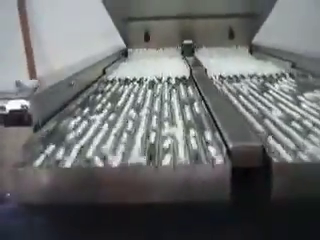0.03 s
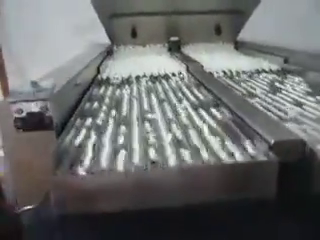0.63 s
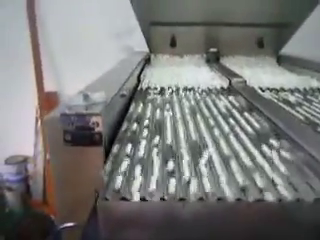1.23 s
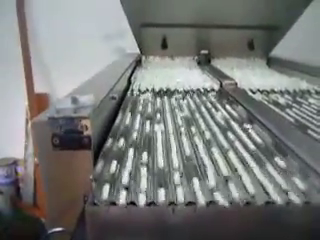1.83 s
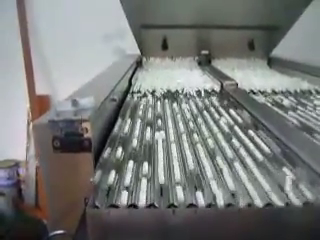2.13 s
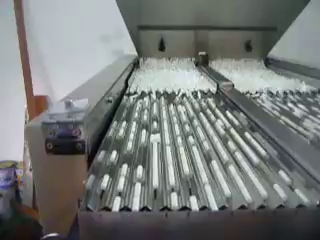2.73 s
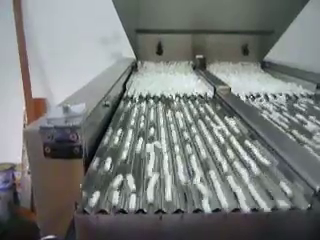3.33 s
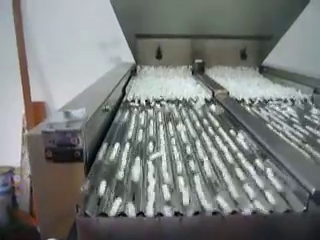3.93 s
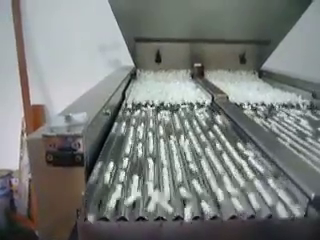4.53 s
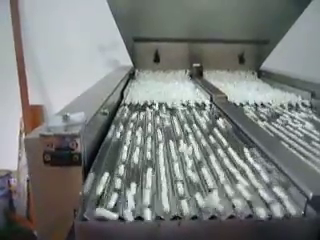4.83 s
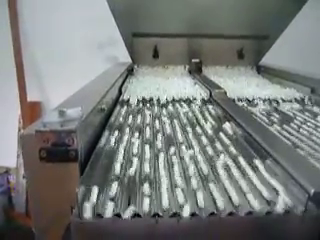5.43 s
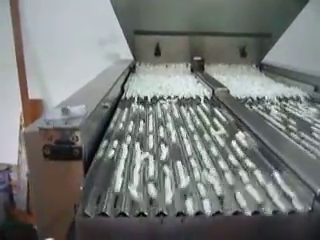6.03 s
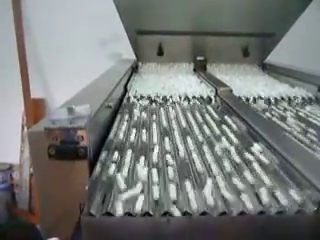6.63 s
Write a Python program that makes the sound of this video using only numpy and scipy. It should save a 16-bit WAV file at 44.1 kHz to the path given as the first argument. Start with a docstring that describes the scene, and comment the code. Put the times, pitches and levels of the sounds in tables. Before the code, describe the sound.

Close up, the vibrating steel trays of a counting machine hum and ring, with a thin high buzz and a fine rattle of capsules. After about a second the machine eases and capsules clatter into a steel chute. A second later comes a louder clatter of sharp plastic ticks, and the hum sinks to idle. Around three seconds in, the full hum returns and runs on steadily over a low shudder.

```python
"""Steel trays of a capsule counting machine, close up: electromagnets shake them at the mains rate,
so they hum and ring while the capsules on them rattle. The drive eases off twice, and capsules drop
into a steel chute with a short plastic clatter. A second feeder adds a thin, high buzz and pauses once.
Underneath, the frame shudders and rings low."""
import sys
import numpy as np
from scipy import signal
from scipy.fft import rfft, irfft
from scipy.io import wavfile
from scipy.ndimage import uniform_filter1d

SR = 44100
rng = np.random.default_rng(int(sys.argv[2]) if len(sys.argv) > 2 else 0)


def generate_wav(signal):
    """Clip the signal to [-1, 1] and save it as 16-bit WAV at the path in sys.argv[1]."""
    frames = np.transpose(np.atleast_2d(signal))
    scaled = np.clip(frames, -1, 1) * 32767
    pcm = np.round(scaled).astype(np.int16)
    wavfile.write(sys.argv[1], SR, pcm)


N = 295470
T = np.arange(N) / SR
MAINS_HZ, EDGE_HZ = 50.071, 8900
BUZZ_ORDERS = np.arange(47, EDGE_HZ // MAINS_HZ)  # mains multiples above the tray's main partials

# second feeder pauses, restarts, then runs harder: (time [s], glide [s], stroke [dB])
FEEDER_STROKES = [(0.84, 0.042, -14), (1.93, 0.027, -1.5), (3.55, 0.039, 0.9)]


def gain_of(db):
    return 10 ** (np.asarray(db) / 20)


def unit_rms(x):
    return x / np.sqrt(np.mean(x ** 2) + 1e-20)


def gains_at(spectrum, hz):
    """Gains of a (frequency [Hz], level [dB]) curve, interpolated in log frequency."""
    knots_hz, db = np.transpose(spectrum)
    return gain_of(np.interp(np.log(hz + 1), np.log(knots_hz + 1), db))


def coloured(x, spectrum):
    """x filtered by a spectrum, at rms 1."""
    hz = np.fft.rfftfreq(len(x), 1 / SR)
    return unit_rms(irfft(rfft(x) * gains_at(spectrum, hz), len(x)))


def add(mix, start_s, sound):
    part = mix[max(round(start_s * SR), 0):][:len(sound)]
    part += sound[:len(part)]


def drift(rate_hz):
    """Random wander of about unit size."""
    knots = rng.standard_normal(400)
    return np.interp(T * rate_hz, np.arange(len(knots)), knots)


def stroke_db(switches):
    """Stroke over time: starts at full, glides to each setting."""
    swing = np.ones(N)
    for start_s, glide_s, setting_db in switches:
        swing += (gain_of(setting_db) - swing) * np.clip((T - start_s) / glide_s, 0, 1)
    return 20 * np.log10(swing)


def driven(full_db, idle_db, slope):
    """Gain that follows the main tray's stroke (slope in dB/dB), over an idle floor."""
    # half, briefly up, idle, near full: (time [s], glide [s], stroke [dB])
    tray_strokes = [(0.87, 0.11, -5.5), (1.94, .06, -2.7), (2.015, .14, -19), (3.11, 0.17, -1)]
    return np.hypot(gain_of(full_db + slope * stroke_db(tray_strokes)), gain_of(idle_db))


def sway():
    """The frame's lowest resonance, stirred by the second feeder, beats against the hum."""
    # (frequency [Hz], relative density [dB])
    resonance = [(150, -63), (225, -26.5), (246, -3.5), (254, 2.5), (262, -6.5), (285, -28.5), (400, -62)]
    return gain_of(-47 + 0.42 * stroke_db(FEEDER_STROKES)) * coloured(rng.standard_normal(N), resonance)


def jolts():
    """The frame swings up and rings low when its load changes."""
    # (time [s], level [dB])
    load_changes = [(0.281, -30), (0.9, -28.5), (2.022, -27.5), (2.15, -23), (3.005, -33.5), (3.173, -42)]
    # (frequency [Hz], relative level [dB], t60 [s])
    frame_modes = [(296.8, -0.5, 0.53), (267, -5, 0.47), (434, -6, 0.33), (495, -8, 0.48)]
    out, t = np.zeros(N), np.arange(SR) / SR
    for start_s, level_db in load_changes:
        ring = sum(gain_of(db - 60 * t / t60_s) * np.sin(2 * np.pi * (hz * t + rng.random()))
                   for hz, db, t60_s in frame_modes)
        add(out, start_s, gain_of(level_db) * ring * (1 - np.exp(-t / 0.012)))
    return out


def surges():
    """Rattle and shudder gains as a crowd of capsules shifts at once."""
    # (peak time [s], 1/e half width [s], rattle [dB], shudder [dB])
    shifts = [(0.31, 0.082, -42, -36), (0.99, 0.17, -37, -38.5), (1.33, .16, -38.5, -40.5),
              (2.1, 0.18, -34.5, -40.5), (3.18, 0.075, -40.5, -40), (5.85, 0.14, -37.5, -36),
              (6.58, .08, -37, -41)]
    power = np.zeros((2, N))
    for peak_s, width_s, rattle_db, shudder_db in shifts:
        swell = np.exp(-((T - peak_s) / width_s) ** 2)
        power += np.outer(gain_of([rattle_db, shudder_db]), swell) ** 2
    return np.sqrt(power)


def rattle(turns):
    """Capsules hop on each stroke, over the dull shudder of the frame."""
    # (frequency [Hz], relative density [dB])
    tap_spectrum = [(300, -28.5), (480, -0.5), (800, 1.5), (990, 3.5), (1200, 0), (1390, 0), (1750, -4.5),
                    (2300, -5), (3700, -13), (4500, -16), (7200, -23), (8100, -28), (9000, -56.5)]
    # (frequency [Hz], relative density [dB])
    shudder_spectrum = [(20, -37), (50, -14), (70, -23), (110, -8), (190, -3), (255, -2.5), (310, -0.5),
                        (360, -0.5), (430, -2), (540, -18.5), (900, -57)]
    tap_surge, shudder_surge = surges()
    tap_gain = np.hypot(driven(full_db=-42, idle_db=-41, slope=0.88), tap_surge)
    shudder_gain = np.hypot(gain_of(-43.5), shudder_surge)
    taps = rng.standard_normal(N) * (rng.random(N) < 5000 / SR)  # 5000 taps/s
    taps *= gain_of(0.83 * np.cos(4 * np.pi * turns) + 1.2 * np.cos(2 * np.pi * turns) + 1.5 * drift(30))
    shudder = coloured(rng.standard_normal(N), shudder_spectrum)
    return tap_gain * coloured(taps, tap_spectrum) + shudder_gain * shudder


def housing(x, t60_s, wet_db):
    """Adds dense echoes from the steel housing and the walls."""
    t = np.arange(SR // 2) / SR
    echoes = rng.standard_normal(len(t)) * (rng.random(len(t)) < 3000 / SR)
    tail = echoes * gain_of(-60 * t / t60_s) * (t > 0.004)
    return x + gain_of(wet_db) * signal.fftconvolve(x, tail / np.linalg.norm(tail))[:N]


def burst(t, spectrum, t60_s, rise_s):
    """Many close modes, struck and dying away."""
    envelope = gain_of(-60 * t / t60_s) * (1 - np.exp(-t / rise_s))
    return envelope * coloured(rng.standard_normal(len(t)), spectrum)


def drops():
    """Each capsule lands with a hard tick, its shell crackles, the chute rings; then a weaker bounce."""
    # (time [s], tick peak [dB], tick pitch [Hz], shell [dB], chute base level [dB], chute pitch [Hz])
    landings = [(0.9161, -17, 5460, -21.5, -24, 1010), (0.9635, -19, 4900, -23, -24, 1090),
                (0.9852, -15, 6800, -23, -30, 800), (1.01, -25, 7200, -28, -27, 1090),
                (1.037, -29, 4520, -26, -30, 1110), (1.061, -23, 5230, -24.5, -28, 1090),
                (1.0982, -24, 5790, -25, -26.5, 1200), (1.2601, -26, 4500, -26, -26.5, 1360),
                (1.3062, -24, 7360, -26.5, -26.5, 1414), (2.0252, -8, 6040, -23, -25, 1266),
                (2.04, -18, 6790, -27, -30, 990), (2.057, -18, 6560, -30, -27, 1700),
                (2.0754, -15, 4720, -22, -28, 1240), (2.1062, -21, 5400, -26, -24.5, 960),
                (2.1317, -13.5, 6300, -21.5, -28, 1150), (2.151, -19, 6440, -25.5, -28, 990),
                (2.2593, -12.5, 5750, -23.5, -24.5, 1246), (2.3284, -17, 5900, -25.5, -22.5, 1285),
                (2.455, -14, 6930, -21.5, -23, 1240), (3.004, -41, 3850, -40, -32.5, 1000)]
    # (frequency [Hz], relative density [dB])
    shell_spectrum = [(1500, -4), (2900, -7), (3900, 0), (4700, 0), (6000, 1), (7300, 2), (8100, -10),
                      (9000, -50)]
    # (frequency [Hz], relative density [dB])
    chute_spectrum = [(250, -16), (600, -4.5), (950, 2), (1350, 0.5), (1700, 2), (2100, 0.5), (3000, -25),
                      (4500, -25.5)]
    # steel under a capsule: (frequency [Hz], relative density [dB])
    clink_spectrum = [(1800, -27), (2500, 0), (3000, 1), (3500, -9.5), (4300, -31.5)]
    ticks, shells, chutes = np.zeros((3, N))
    t = np.arange(SR // 5) / SR
    tick_rise_s = 0.00038
    tick_envelope = t / tick_rise_s * np.exp(1 - t / tick_rise_s)
    for time_s, tick_db, tick_hz, shell_db, chute_db, chute_hz in landings:
        start_s = time_s + 0.0007
        add(ticks, start_s, gain_of(tick_db) * tick_envelope * np.sin(2 * np.pi * tick_hz * t))
        bounce_s = 0.011 * rng.uniform(0.9, 1.1)
        for delay_s, hit_db in [(0, 0), (bounce_s, -7)]:
            shell = gain_of(shell_db) * burst(t, shell_spectrum, t60_s=0.035, rise_s=0.0003)
            chute = gain_of(chute_db + 1) * burst(t, chute_spectrum, t60_s=0.036, rise_s=0.00069)
            clink = gain_of(chute_db - 7.5) * burst(t, clink_spectrum, t60_s=0.036, rise_s=0.00024)
            note = gain_of(chute_db + 4 - 60 * t / 0.028) * np.sin(2 * np.pi * chute_hz * t)
            add(shells, start_s + delay_s, gain_of(hit_db) * shell)
            add(chutes, start_s + delay_s, gain_of(hit_db) * (chute + clink + note))
    return ticks + housing(shells, t60_s=0.19, wet_db=-5) + housing(chutes, t60_s=0.17, wet_db=-3.5)


def struck_phases(orders, decay_cycles):
    """Phases [rad] of partials in metal struck on both half strokes."""
    cycle = np.arange(1024) / 1024
    blows = np.exp(-cycle / decay_cycles) + 1.04 * np.exp(-((cycle + 0.5) % 1) / decay_cycles)
    spectrum = rfft(blows * rng.standard_normal(len(cycle)))
    return -np.angle(spectrum)[np.round(orders).astype(int)]


def buzz(turns, sizes, blend):
    """One cycle of ringing metal, repeated; loose contact blends in two other ways of ringing."""
    cycle = np.linspace(0, 1, 4097)
    angle = 2 * np.pi * np.outer(cycle, BUZZ_ORDERS)
    shapes = [np.cos(angle - struck_phases(BUZZ_ORDERS, decay_cycles=0.62)) @ sizes for _ in range(3)]
    steady, slow, fast = [np.interp(turns % 1, cycle, shape) for shape in shapes]
    return unit_rms(steady + blend * (drift(7) * slow + drift(16) * fast))


def second_feeder(turns):
    """Metal chatters on both half strokes, favouring even multiples; fizz pulses once a cycle."""
    # strongest partials: (frequency [Hz], relative level [dB])
    whines = [(2702, -61), (2756, -47.5), (2955, -51), (3004, -45), (3052, -46), (3155, -52.5), (3305, -76),
              (3354, -60.5), (3607, -52.5), (3704, -48), (3758, -67.5), (3806, -56.5), (3854, -48.5),
              (3903, -64.5), (3957, -68), (4156, -55), (4807, -55.5), (4904, -63.5), (5206, -62.5),
              (5857, -64.5), (6207, -60), (7009, -58), (7407, -53), (8592, -73)]
    # envelope of the weaker partials: (frequency [Hz], relative level [dB])
    chatter = [(2000, -79.5), (2600, -71.5), (3300, -64.5), (3900, -71.5), (4400, -80), (4650, -64),
               (5000, -61.5), (7200, -68.5), (8100, -71.5), (9000, -96.5)]
    # (frequency [Hz], relative density [dB])
    fizz_spectrum = [(2000, -11), (2850, -8.5), (3030, 7), (3250, -2.5), (3750, 8), (4050, -11.5),
                     (4190, 6.5), (4350, -8), (7280, -4), (7410, 4), (7540, -10), (8000, -11),
                     (8500, -17.5), (9000, -46.5)]
    hz = BUZZ_ORDERS * MAINS_HZ
    sizes = gains_at(chatter, hz) * gain_of(-4 * (BUZZ_ORDERS % 2))
    for whine_hz, db in whines:
        sizes[np.argmin(abs(hz - whine_hz))] = gain_of(db)
    pulses = gain_of(20 * np.sin(2 * np.pi * turns))
    fizz = gain_of(-6.5) * coloured(rng.standard_normal(N) * pulses, fizz_spectrum)
    return gain_of(-44.5 + stroke_db(FEEDER_STROKES)) * (buzz(turns, sizes, blend=0.15) + fizz)


def singing(hum, turns):
    """Single partials swell or hush as the steel sheets drift in and out of tune with them."""
    # (peak time [s], length [s], mains multiple, lift [dB])
    swells = [(0.1, 1.1, 60, -7), (0.15, 1.23, 61, 9), (.3, 1.1, 15, 6), (0.398, 1.8, 9, 6),
              (.55, 1.6, 6, 3.5), (0.65, 0.74, 26, 9.5), (1.65, 1, 21, 15), (2.852, 0.86, 5, 8),
              (3.265, .5, 7, 6), (3.454, 1, 6, 3.5), (3.505, 0.46, 29, 5), (4.7, 1.6, 8, 1.5),
              (5.398, 0.93, 31, 4), (5.75, 1.3, 55, 3.5), (5.4, .6, 20, 1), (6.2, .9, 19, 7),
              (6.25, .9, 7, 1), (6.34, 3.7, 12, 5.5)]
    out = hum.copy()
    for peak_s, length_s, order, lift_db in swells:
        swell = np.cos(np.pi * np.clip((T - peak_s) / length_s, -0.5, 0.5))
        carrier = np.exp(2j * np.pi * round(order) * turns)
        amplitude = uniform_filter1d(hum / carrier, size=round(2 * SR / MAINS_HZ))  # two-cycle mean
        partial = 2 * (carrier * amplitude).real
        out += (gain_of(lift_db * swell) - 1) * partial
    return out


def stack(turns, orders, sizes, phases, waver_db):
    """Partials of a repeating stroke, at rms 1; weaker ones waver more."""
    out = np.zeros(N)
    for order, size, phase in zip(orders, sizes, phases):
        waver = gain_of(waver_db * min(sizes.max() / size, 3) * drift(5))
        out += size * waver * np.cos(2 * np.pi * order * turns - phase)
    return unit_rms(out)


def tray(turns):
    """The magnets hum, the springs knock once a cycle, and the steel sheet rings with every knock."""
    # (mains multiple, level within its group [dB])
    partials = [(1, -32), (2, -1.5), (3, -1), (4, 0.5), (5, -2), (6, -5.5), (7, -13), (8, -5.5), (9, -14),
                (10, -20), (11, -19), (12, -16), (13, -11), (14, -17.5), (15, -13), (16, -18.5), (17, -24),
                (18, -19.5), (19, -13.5), (20, -6), (21, -20), (22, -16.5), (23, -23.5), (24, -18.5),
                (25, -20.5), (26, -17.5), (27, -9.5), (28, -22), (29, -10.5), (30, -26), (31, -16.5),
                (32, -15.5), (33, -30), (34, -23.5), (35, -17.5), (36, -34), (37, -28), (38, -16),
                (39, -21), (40, -25.5), (41, -18), (42, -26), (43, -38), (44, -23), (45, -18), (46, -27.5)]
    # envelope of the weak partials above those: (frequency [Hz], relative level [dB])
    overtones = [(2350, -21), (2800, -25), (3400, -29.5), (4150, -25.5), (4500, -43), (7000, -33.5),
                 (9000, -79)]
    # slow level trims: (time [s], knock [dB], ring [dB])
    trims = [(0, -2.5, -2.5), (.3, -0.5, -4), (.85, -1, -1.6), (3.18, 0.5, -2), (3.35, 1, .5),
             (5.15, 1.2, 0.3), (5.25, -1.5, 0.5), (5.6, 0, 1.5), (5.68, -1.5, -0.4), (6.7, -1.3, -0.5)]
    trim_s, knock_db, ring_db = np.transpose(trims)
    hum = driven(full_db=-32.5, idle_db=-40, slope=1.7)
    thrum = driven(full_db=-35, idle_db=-60, slope=0.59)
    knock = gain_of(np.interp(T, trim_s, knock_db)) * driven(full_db=-35, idle_db=-46.5, slope=1.3)
    ring = gain_of(np.interp(T, trim_s, ring_db)) * driven(full_db=-34.5, idle_db=-42, slope=0.99)
    orders, db = np.transpose(partials)
    # low partials align as a knock; the magnets pull twice a cycle, slightly late; high ones ring on
    pull_lag_rad = 1.0 * np.isin(orders, [2, 4])
    phases = np.where(orders < 10, pull_lag_rad, struck_phases(orders, decay_cycles=0.41))
    groups = np.digitize(orders, [3, 6, 10])
    out = np.zeros(N)
    for group, (gain, waver_db) in enumerate([(hum, 0.2), (thrum, 0.3), (knock, 0.4), (ring, 0.5)]):
        own = groups == group
        out += gain * stack(turns, orders[own], gain_of(db[own]), phases[own], waver_db)
    treble = buzz(turns, gains_at(overtones, BUZZ_ORDERS * MAINS_HZ), blend=0.62)
    return out + gain_of(-14.5) * ring * treble


def scene():
    turns = MAINS_HZ * T + 0.00015 * drift(21)  # stroke phase [cycles]
    hum = singing(tray(turns) + second_feeder(turns), turns)
    return (hum + rattle(turns) + sway() + jolts() + drops())[None]


def record(dry):
    """A small, narrow-band microphone into a converter that rests slightly off zero."""
    dc_offset = -0.051
    lowpass = signal.firwin(255, EDGE_HZ, window=("kaiser", 9), fs=SR)
    return dc_offset + signal.oaconvolve(dry, lowpass[None], "same")


dry = scene()
out = record(dry)
generate_wav(out)
```